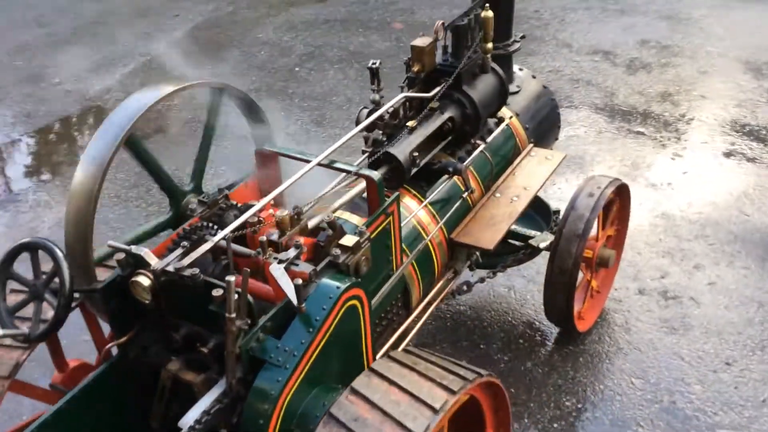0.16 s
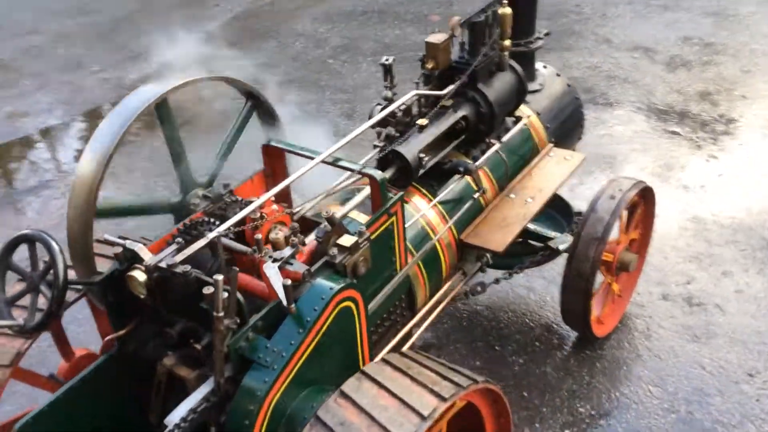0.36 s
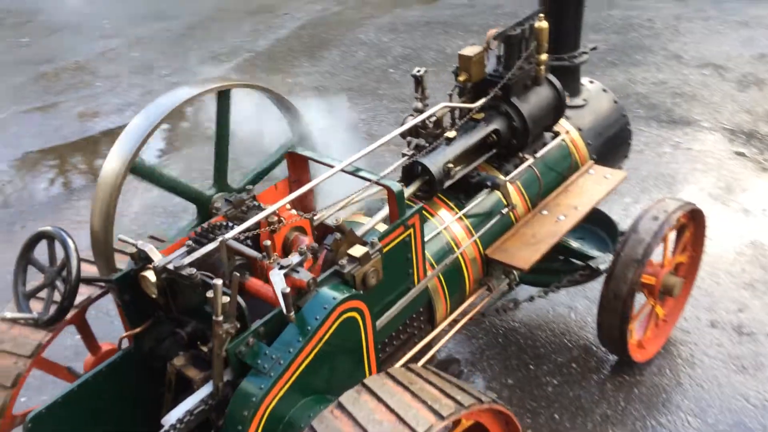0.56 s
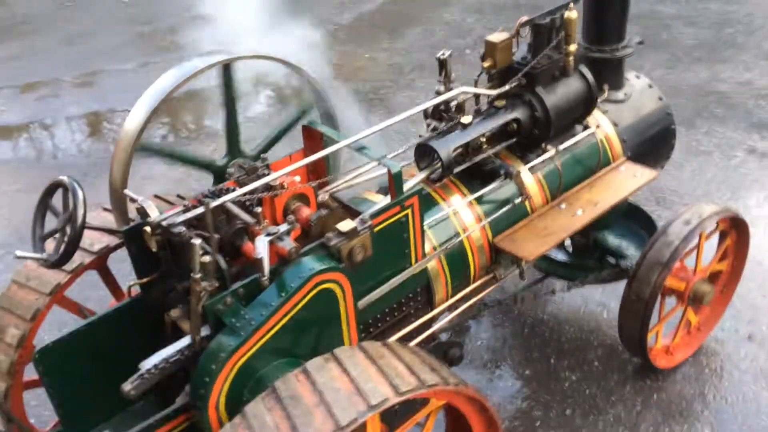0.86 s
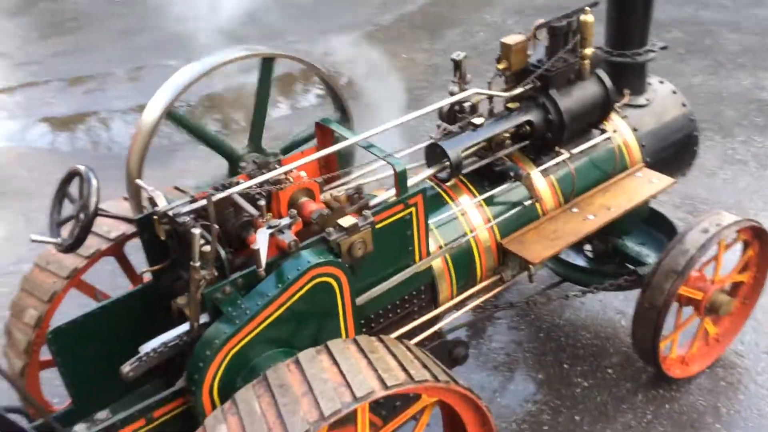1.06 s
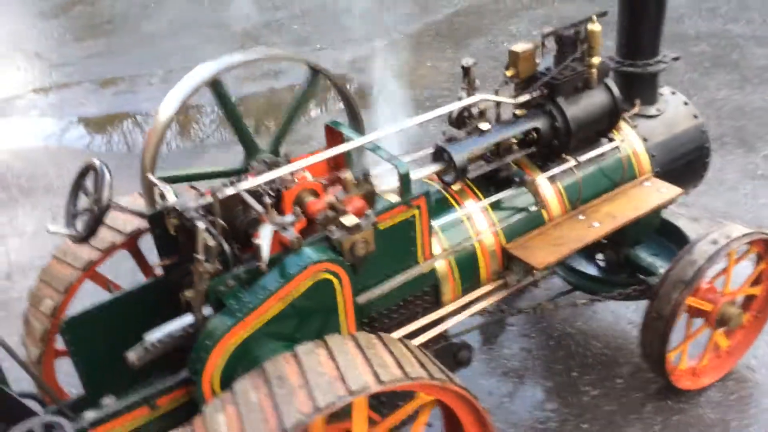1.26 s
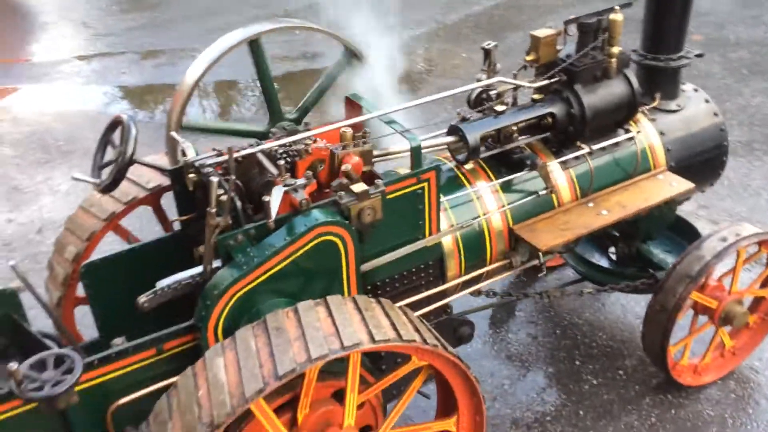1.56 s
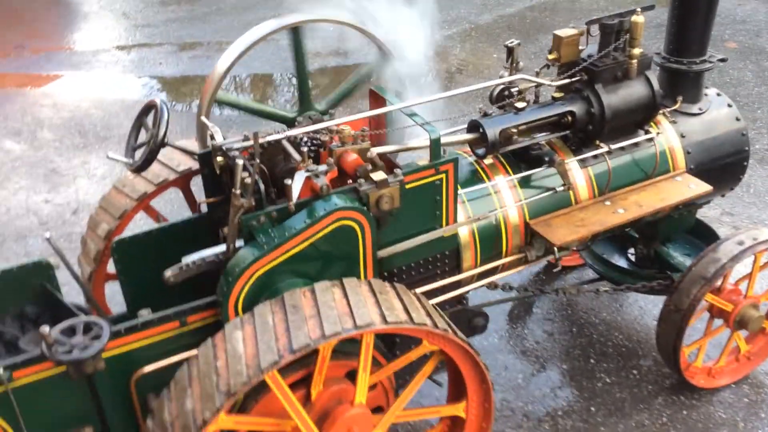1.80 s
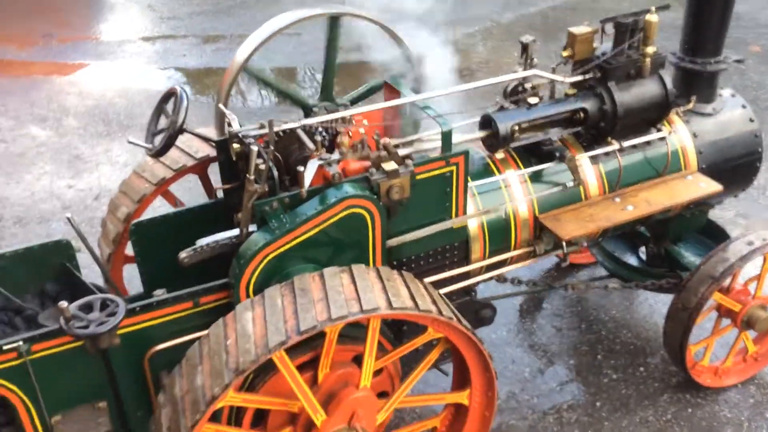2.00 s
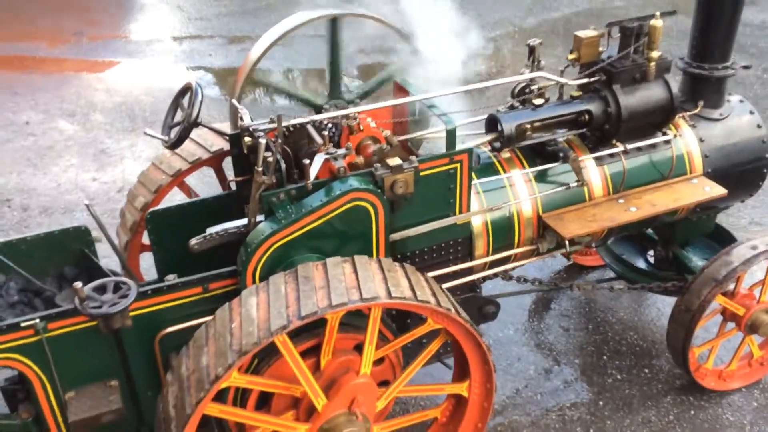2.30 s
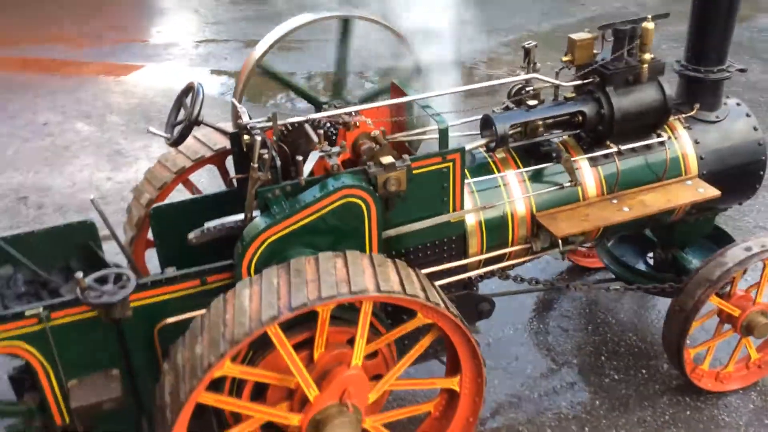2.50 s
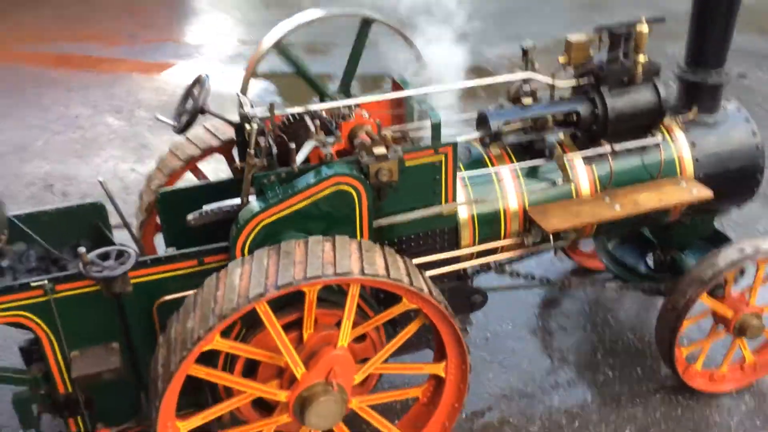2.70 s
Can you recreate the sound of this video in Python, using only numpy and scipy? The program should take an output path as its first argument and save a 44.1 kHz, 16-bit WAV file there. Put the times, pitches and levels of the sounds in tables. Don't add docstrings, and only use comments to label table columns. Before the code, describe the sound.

A small steam engine leaks a continuous soft, bright hiss outdoors, slightly hollow during the first second, then drier, while loud low gusts bump and rumble against the close handheld microphone and gradually ease.

```python
import sys
import numpy as np
from scipy import signal
from scipy.fft import rfft, irfft
from scipy.io import wavfile
from scipy.ndimage import uniform_filter1d, map_coordinates

SR = 44100
rng = np.random.default_rng(int(sys.argv[2]) if len(sys.argv) > 2 else 0)


def put_to_file(sound):
    columns = np.atleast_2d(sound).T
    safe = np.clip(columns, -1, 1)
    whole_steps = np.round(safe * 32767)
    wavfile.write(sys.argv[1], SR, whole_steps.astype(np.int16))


def decibels_to_gain(level_db):
    exponent = np.asarray(level_db, float) / 20
    return 10 ** exponent


N = 125685

# t/s, level/dB
BREEZE_LEVEL = [(0, -72), (.065, -63), (.085, -49), (.2, -43.5), (.3, -27), (.5, -42), (1.09, -44.5),
                (1.14, -37.5), (1.53, -35), (1.57, -57), (1.6, -26.5), (1.67, -43.5), (1.72, -37),
                (2.03, -39.5), (2.38, -50.5), (2.41, -48.5), (2.55, -42.5), (2.82, -47.5)]
# t/s, spread/s,
# level/dB, f/Hz
EDGE_TONES = [(0.12, 0.0025, -42, 394), (.16, 0.0048, -45.5, 671), (0.221, 0.0018, -38.5, 605),
              (0.248, 0.0046, -24.5, 503.3), (.271, 0.0023, -55, 484), (0.287, 0.0052, -22, 486.4),
              (.303, 0.0041, -21, 559.3), (0.319, 0.015, -29.5, 465.6), (.353, 0.0074, -35.5, 490.5),
              (0.479, 0.0022, -40.5, 481), (.561, 0.0014, -34.5, 454), (.298, 0.0051, -40.5, 1038),
              (.585, 0.013, -49.5, 506), (.635, 0.025, -54.5, 526), (1.041, 0.011, -40, 392),
              (1.33, 0.0078, -43, 431), (1.416, 0.0029, -33.5, 473.6), (1.614, 0.001, -22.5, 480.3),
              (1.626, 0.0011, -20.5, 487.2), (1.82, 0.0015, -28, 478), (2.274, 0.0023, -44.5, 519),
              (1.632, 0.0093, -32, 407.3), (1.839, 0.0061, -35.5, 472.2), (1.908, 0.0054, -29.5, 330),
              (1.975, 0.0099, -30.5, 337.8), (1.97, 0.0037, -44, 730), (2.172, 0.0043, -26.5, 403),
              (1.133, 0.0032, -37, 516), (2.327, 0.002, -40.5, 529), (2.353, 0.0066, -32.5, 282.6),
              (.274, 0.004, -21.5, 149.3), (0.329, 0.0042, -21.5, 206.5), (.578, 0.01, -36, 193),
              (2.129, 0.011, -44, 200), (2.188, .004, -27, 230), (.455, .006, -29, 240),
              (1.786, .004, -31, 260), (2.05, .005, -36, 300), (.25, .003, -41, 1030),
              (.215, 0.007, -38.5, 153.6), (1.601, .007, -29, 202), (1.311, 0.0051, -28.5, 171),
              (1.505, 0.011, -29, 212)]
# t/s, spread/s, level/dB, f/Hz
EARLY_EDDIES = [(0.094, 0.012, -37, 140.3), (0.178, 0.0016, -39, 182), (0.201, 0.0039, -32, 146),
                (0.249, 0.0047, -23, 356.5), (0.292, 0.0051, -19, 367.6), (0.342, 0.0015, -20.5, 284.6),
                (0.383, 0.0023, -24, 189.5), (0.407, 0.0017, -15.5, 251.6), (0.432, 0.011, -25, 201),
                (0.457, 0.0026, -26.5, 182), (0.483, 0.0089, -35, 232), (0.51, 0.0084, -39, 98),
                (0.538, 0.0023, -48, 210), (0.562, 0.0015, -24, 340), (0.602, 0.0033, -25.5, 207.5),
                (0.682, 0.00094, -22, 323.4), (0.735, 0.0053, -31.5, 209), (0.767, 0.0035, -23, 164.3),
                (0.792, 0.011, -37, 165.7), (0.865, 0.0023, -22.5, 357.2), (0.898, 0.0064, -27.5, 136.5),
                (0.937, 0.00074, -26, 312), (0.97, 0.0006, -22.5, 255.5), (1.015, 0.015, -28.5, 202),
                (1.067, 0.003, -34, 296.7), (1.134, 0.004, -21, 175), (1.182, 0.0043, -26, 150.7),
                (1.2, 0.0034, -27.5, 161), (1.217, 0.0023, -21.5, 206.8), (1.241, 0.0043, -22.5, 171.8)]
LATE_EDDIES = [(1.294, 0.005, -23.5, 180.6), (1.368, 0.0043, -27, 152), (1.388, 0.0041, -24, 188.4),
               (1.417, 0.0022, -25.5, 169.3), (1.478, 0.0091, -25.5, 168.5), (1.555, 0.0044, -29.5, 317.5),
               (1.618, 0.004, -21, 210), (1.702, 0.0024, -28, 167), (1.75, 0.0021, -26, 167.6),
               (1.796, 0.0014, -22, 189.8), (1.834, 0.0019, -22.5, 334.6), (1.921, 0.014, -28.5, 248.4),
               (1.95, 0.0031, -20, 235.5), (2.011, 0.0036, -24, 163.6), (2.049, 0.004, -57, 178),
               (2.105, 0.0029, -29.5, 185), (2.159, 0.0015, -31, 220), (2.19, 0.0047, -22.5, 180.2),
               (2.236, 0.001, -18.5, 331.3), (2.281, 0.0073, -37, 248.4), (2.317, 0.0071, -26, 157),
               (2.367, 0.0068, -28.5, 191.5), (2.449, 0.0088, -45, 124), (2.508, 0.0055, -34, 160.6),
               (2.552, 0.0027, -27, 243.3), (2.587, 0.0038, -32.5, 257), (2.691, 0.0031, -34, 167.7),
               (2.737, 0.0019, -31, 263.5), (2.782, 0.0029, -40.5, 182.5), (2.85, 0.0043, -29.5, 227.6)]
# t/s, peak level/dB, f/Hz
TEAR_OFFS = [(.216, -50, 800), (.247, -39, 620), (0.25, -40, 900), (.271, -48, 800), (0.294, -36, 1520),
             (.298, -49, 2000), (.304, -43, 1210), (0.307, -42, 850), (0.322, -38, 790), (.338, -38, 800),
             (.355, -43, 850), (.4065, -24.5, 790), (0.4067, -38, 1700), (.561, -33.5, 790),
             (.589, -29, 396), (0.596, -32, 454), (.677, -22.5, 460), (.682, -38, 790), (.688, -40, 1800),
             (.711, -48, 2720), (0.7122, -51, 1000), (.741, -44, 750), (0.87, -54, 750), (.863, -38, 694),
             (.937, -42, 600), (1.132, -39.5, 543), (1.555, -42, 550), (1.251, -47, 800), (1.405, -52, 750),
             (1.498, -53, 800), (1.615, -32, 850), (1.626, -29, 844), (1.627, -40, 1500), (1.631, -38, 900),
             (1.819, -55, 750), (1.902, -42, 750), (1.947, -45, 800), (2.107, -43, 750), (2.181, -43, 1100),
             (2.237, -47, 770), (2.322, -44, 795), (2.551, -43, 413), (2.558, -42, 400), (2.693, -42, 420),
             (2.735, -41.5, 720)]
# t/s, length/s, level/dB, f/Hz
SPUTTER_BURSTS = [
    (0.077, .09, -57, 14700),
    (.65, .085, -54, 14600),
    (1.218, 0.14, -52, 14950),
    (1.204, 0.12, -60, 13200),
    (1.687, 0.18, -56, 15100),
    (2.292, 0.28, -53, 15000),
]
# t/s, length/s, level/dB, first f/Hz, last f/Hz
BRASS_GLINTS = [(0.19, 2.5, -65.5, 6200, 8000), (0.92, 2.65, -68, 3700, 4900), (0.35, 1.7, -68, 4900, 4800),
                (1.15, 0.24, -68.5, 1760, 1850), (1.1, 0.12, -61.5, 3500, 2200),
                (1.34, 0.07, -63.5, 1700, 1800), (1.95, 0.34, -65, 2500, 2900), (.1, .6, -66, 3600, 3500),
                (.68, .12, -64, 2100, 3700), (1.52, 1.3, -66.5, 2010, 1700), (2.8, 1.2, -77, 6100, 11400)]
# f/Hz, width/Hz, level/dB
DRAUGHT_MODES = [(1724, 340, -61), (2710, 710, -60), (5300, 240, -69.5), (614, 125, -62.5)]
# f/Hz, level/dB
JET_SPECTRUM = [(300, -9), (1100, -6), (3300, -5.5), (4300, -6), (10000, -5), (13500, -1.5), (14700, 0.5),
                (15300, 0)]


def unit(x):
    return x / np.sqrt(np.mean(x ** 2, axis=-1, keepdims=True))


def shaped(x, gain):
    size = x.shape[-1]
    f = np.arange(size // 2 + 1) * SR / size + 1e-3
    return unit(irfft(rfft(x) * gain(f), size))


def hump(hz, rise, fall):
    return lambda f: (f / hz) ** rise / np.sqrt(1 + (f / hz) ** (2 * (rise + fall)))


def band(hz, width_hz):
    noise = rng.standard_normal(N + 1)
    return shaped(noise, lambda f: 1 / np.sqrt(1 + (2 * (f - hz) / width_hz) ** 4))[:N]


def walk(rate):
    k = int(SR / rate)
    once = uniform_filter1d(rng.standard_normal(N), k)
    return unit(uniform_filter1d(once, k))


def waver(noise, hz):
    drift = shaped(noise, lambda f: f * np.exp(-(f / hz) ** 2 * 10))
    phase = 2 * np.pi * np.cumsum(hz * np.exp(0.14 * drift)) / SR
    overtone = decibels_to_gain(-24) * np.sin(2 * phase)
    return np.sqrt(2) * (np.sin(phase) + overtone)


def breeze(t):
    db = np.interp(t, *np.array(BREEZE_LEVEL).T) + 1.5 * walk(46.5)
    rumble = shaped(rng.standard_normal(N + 1), hump(141, 0.57, 2.324))[:N]
    return decibels_to_gain(db) * rumble


def flutters(t):
    out = np.zeros(N)
    noises = rng.standard_normal((len(EDGE_TONES), 4096))
    for (s, spread, db, hz), noise in zip(EDGE_TONES, noises):
        start = int(s * SR) - len(noise) // 2
        near = slice(start, start + len(noise))
        bell = np.exp(-((t[near] - s) / spread) ** 2 / 2)
        out[near] += decibels_to_gain(db) * waver(noise, hz) * bell
    return out


def snaps(t):
    out = np.zeros(N)
    for s, db, hz in TEAR_OFFS:
        near = slice(int(s * SR) - 512, int(s * SR) + 512)
        cycles = (t[near] - s) * hz
        out[near] += decibels_to_gain(db) * np.sin(2 * np.pi * cycles) * np.exp(-(cycles / 0.44) ** 2 / 2)
    return out


def eddy_slap(phase, db, start_phase):
    swing = np.sin(phase + start_phase) * np.exp(-(phase / 1.73) ** 2 / 2)
    crack = np.sin(2.5 * phase) * np.exp(-(phase / 1.1) ** 2 / 2)
    return swing + decibels_to_gain(-28.5 + (db + 22) / 2) * crack


def eddy_puff(t, spread, hz, noise):
    attack, decay, wake_s = 1.55, 1.5, 0.0099
    broad = hump(0.99 * hz, 0.14, 2.44)
    colour = lambda f: broad(f) / np.sqrt(1 + (f / (2.48 * hz)) ** (2 * 3.5))
    bell = np.exp(-(t / (np.where(t < 0, attack, decay) * spread)) ** 2 / 2)
    wake = decibels_to_gain(6) * np.exp(-np.abs(t) / np.where(t < 0, spread, wake_s))
    strand = decibels_to_gain(-1.5) * waver(noise[::-1], 0.85 * hz)
    puff = (shaped(noise, colour) + strand) * np.maximum(bell, wake)
    return puff / np.sqrt(np.sum(puff ** 2 * bell) / np.sum(bell ** 3))


def eddies():
    half = 4096
    out = np.zeros(N + 4 * half)
    t = (np.arange(2 * half) - half) / SR
    rows = list(EARLY_EDDIES) + list(LATE_EDDIES)
    noises = rng.standard_normal((len(rows), 2 * half))
    for (s, spread, db, hz), noise in zip(rows, noises):
        slap = eddy_slap(t * hz * 2 * np.pi, db, 3 * noise[0])
        puff = eddy_puff(t, spread, hz, noise)
        share = decibels_to_gain(-4) * (0.0069 / spread) ** 0.63
        i = int(s * SR) + half
        out[i:i + 2 * half] += decibels_to_gain(db) * (puff + 2 * share * slap) / np.sqrt(1 + share ** 2)
    return out[2 * half:2 * half + N]


def sputters(t):
    out = np.zeros(N)
    for s, length, db, hz in SPUTTER_BURSTS:
        swell = np.exp(-((t - s) / length * 2 - 1) ** 2)
        out += decibels_to_gain(db + 3 * walk(40)) * band(hz, 680) * swell
    return out


def glints(t):
    width_hz = 380
    out = np.zeros(N)
    for s, length, db, first_hz, last_hz in BRASS_GLINTS:
        hz = first_hz + (last_hz - first_hz) * (t - s) / length
        phase = 2 * np.pi * np.cumsum(hz) / SR
        air = band(0, width_hz) * np.cos(phase) + band(0, width_hz) * np.sin(phase)
        swell = np.exp(-((t - s) / length * 2 - 1) ** 4)
        out += decibels_to_gain(db + 1.5 * walk(6)) * air * swell
    return out


def draught(t):
    fade = 1 / (1 + np.exp((t - 1.03) / 0.074))
    out = np.zeros(N)
    for hz, width_hz, db in DRAUGHT_MODES:
        out += decibels_to_gain(db + 1.8 * walk(9)) * band(hz, width_hz)
    return fade * out


def leak(t):
    near_m, far_m, slide = 0.1, 0.8, 0.04
    hz, db = np.array(JET_SPECTRUM).T
    jet = shaped(rng.standard_normal(N + 1), lambda f: decibels_to_gain(np.interp(np.log(f), np.log(hz), db)))[:N]
    jet = jet * decibels_to_gain(-47 - 0.5 * t + 0.45 * walk(4.9))
    out = jet
    for share in rng.random(12) ** 2:
        path_m = (near_m + share * far_m) * (1 - slide * (t + walk(1.5)))
        image = map_coordinates(jet, [(t - path_m / 343) * SR], mode="mirror")
        out = out + decibels_to_gain(-23) * walk(3.9) * image
    return out


def scene():
    t = np.arange(N) / SR
    wind = breeze(t) + flutters(t) + snaps(t) + eddies()
    engine = sputters(t) + glints(t) + draught(t) + leak(t)
    return (wind + engine)[None]


def low_pass(x):
    return signal.sosfilt(signal.butter(12, 15460, fs=SR, output="sos"), x)


def record(dry):
    bend, squash = 0.28, 3.4
    x = np.tanh(squash * (dry + bend * dry ** 2)) / squash
    port = signal.butter(3, 53, "high", fs=SR, output="sos")
    top_cut = signal.ellip(14, 0.1, 80, 15310, fs=SR, output="sos")
    x = signal.sosfilt(port, x)
    x = signal.sosfilt(top_cut, x)
    return low_pass(x)


dry = scene()
out = record(dry)
put_to_file(out)
```